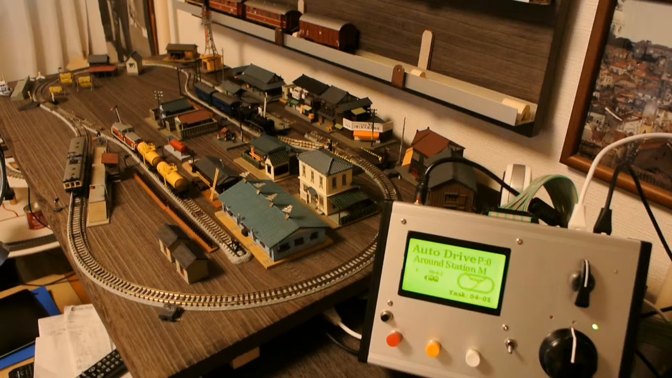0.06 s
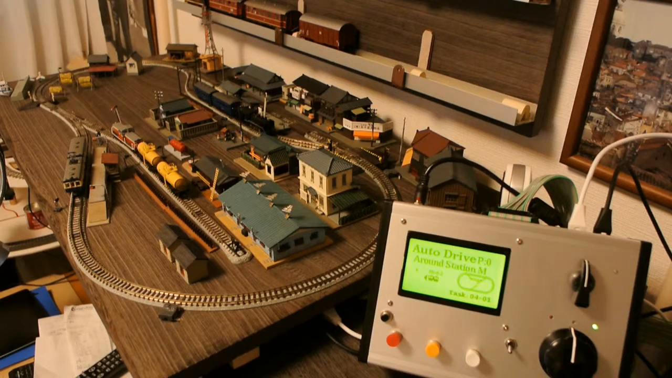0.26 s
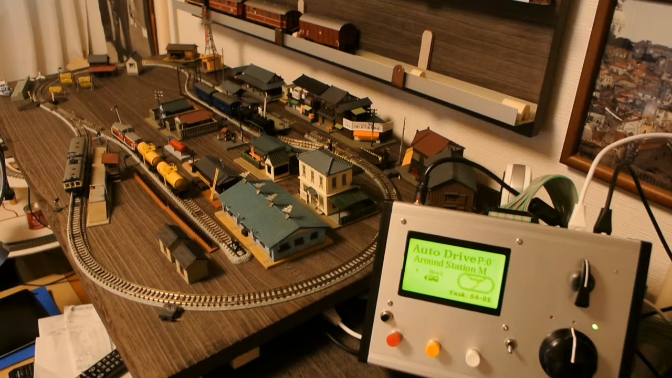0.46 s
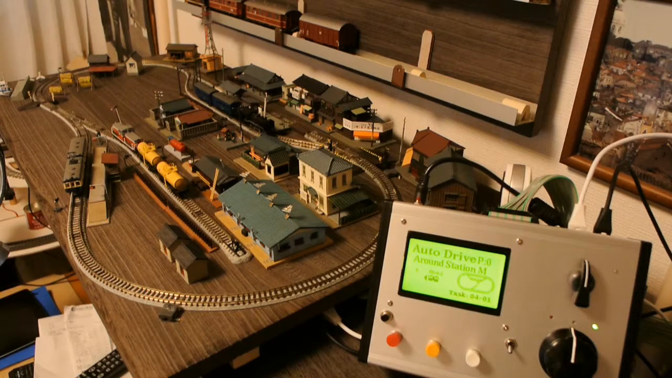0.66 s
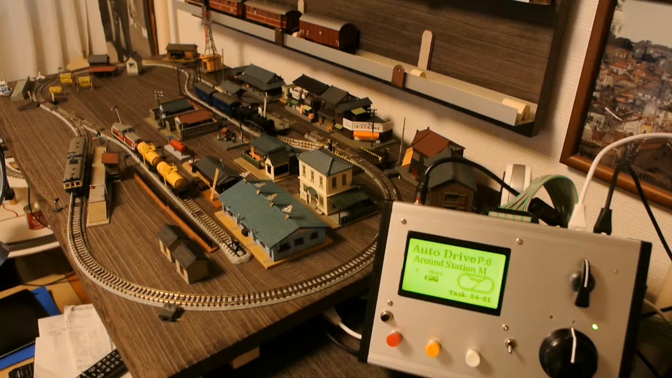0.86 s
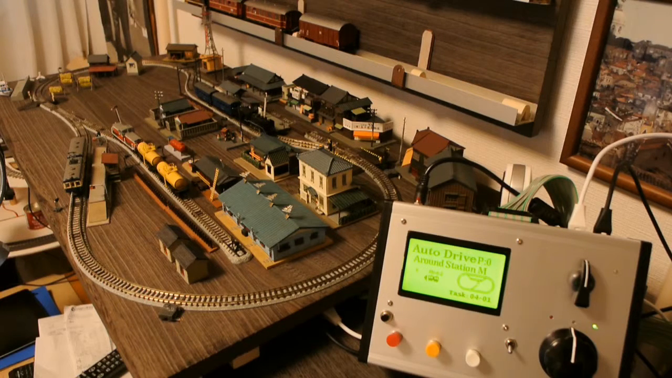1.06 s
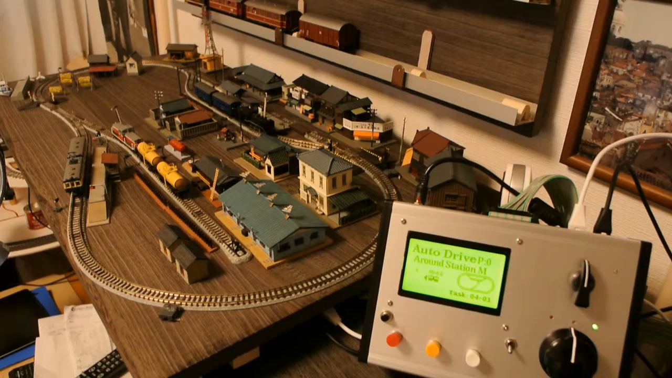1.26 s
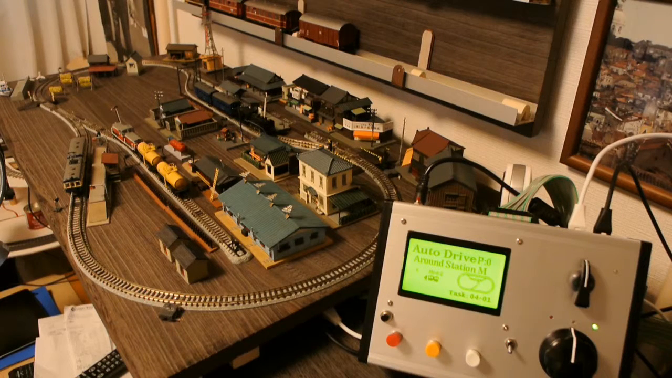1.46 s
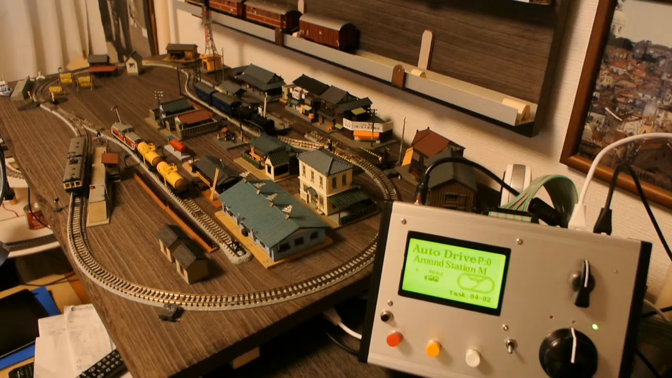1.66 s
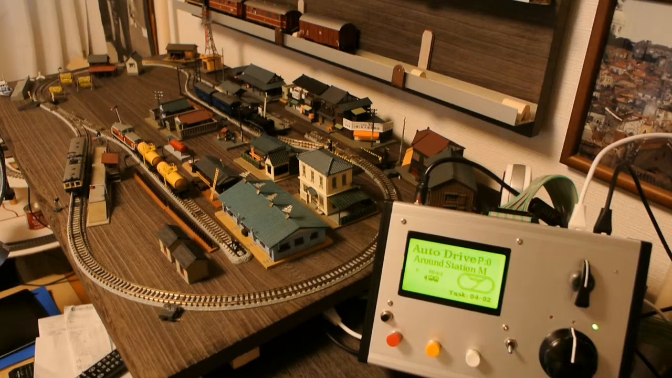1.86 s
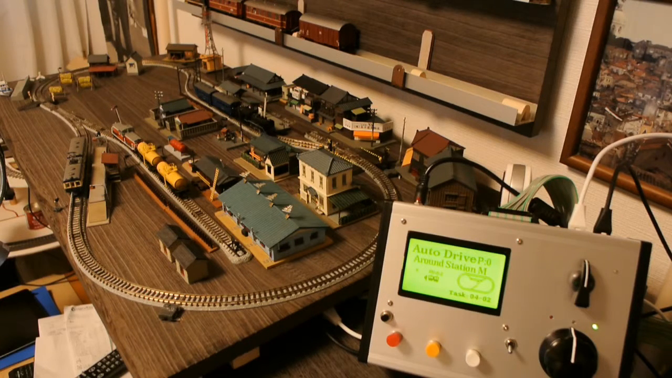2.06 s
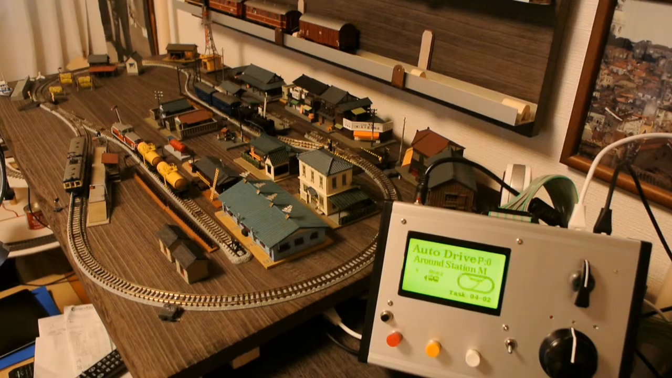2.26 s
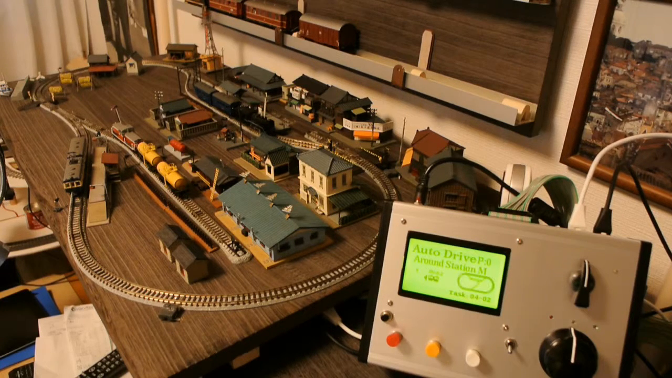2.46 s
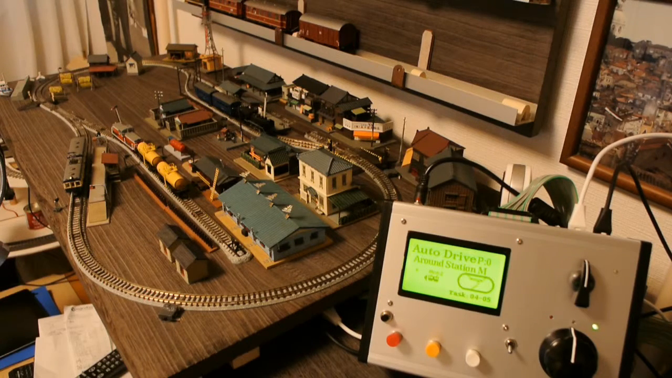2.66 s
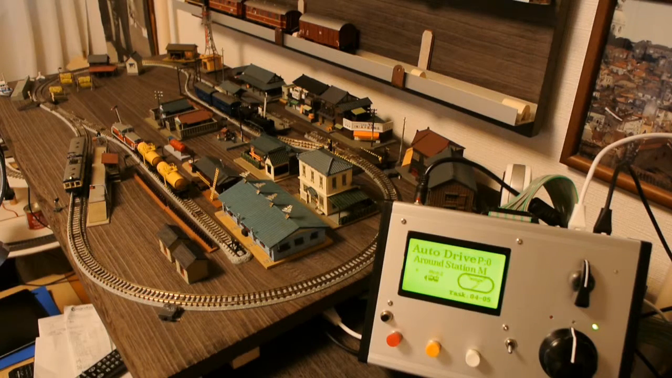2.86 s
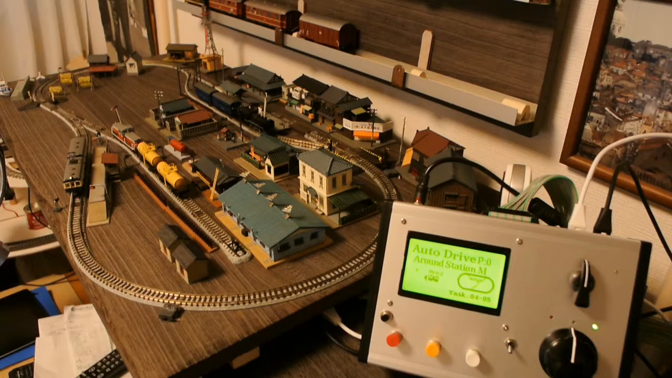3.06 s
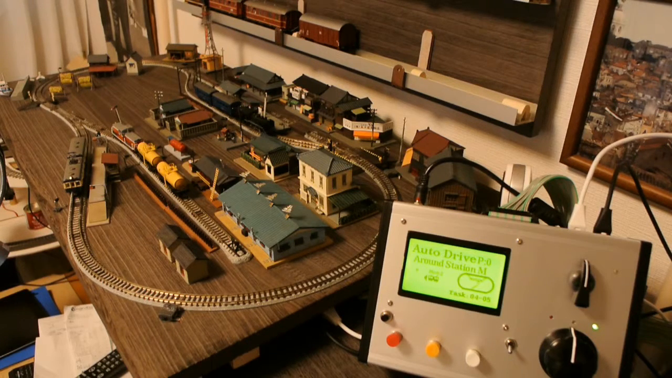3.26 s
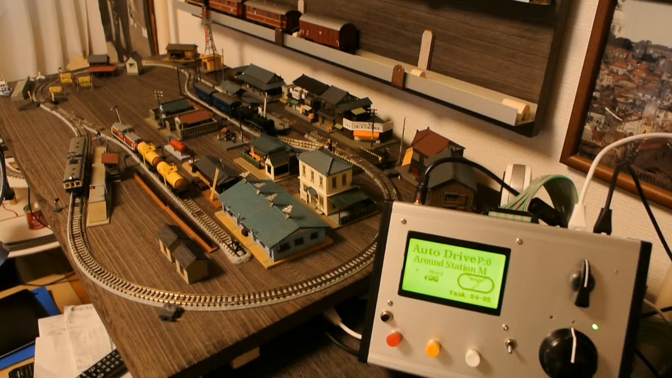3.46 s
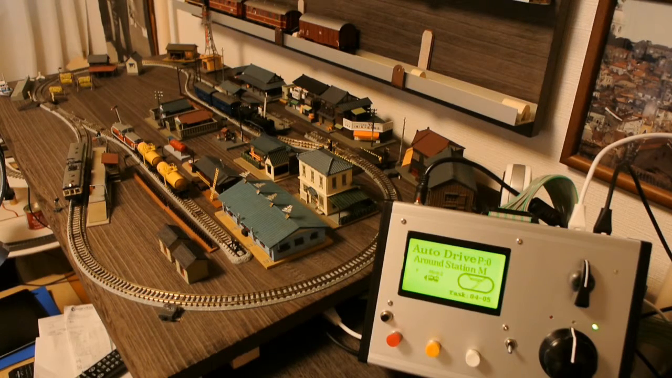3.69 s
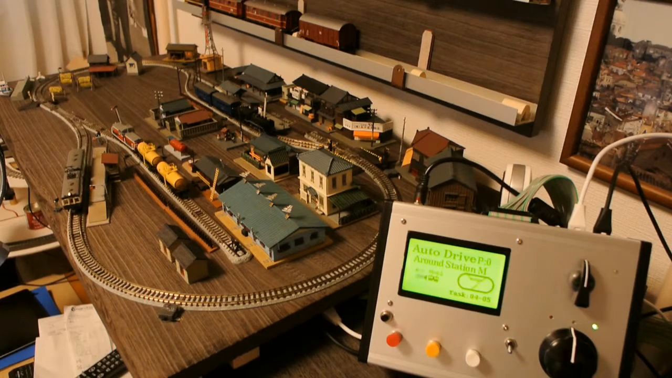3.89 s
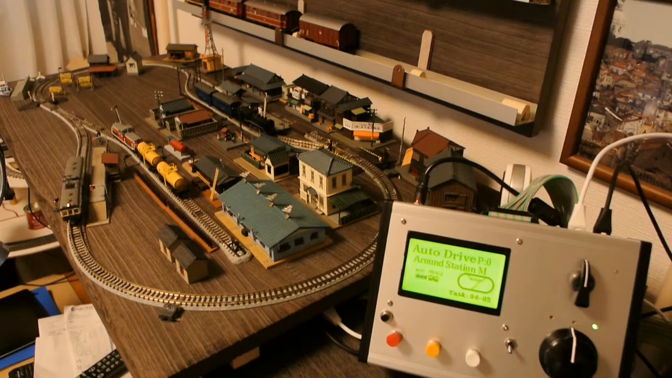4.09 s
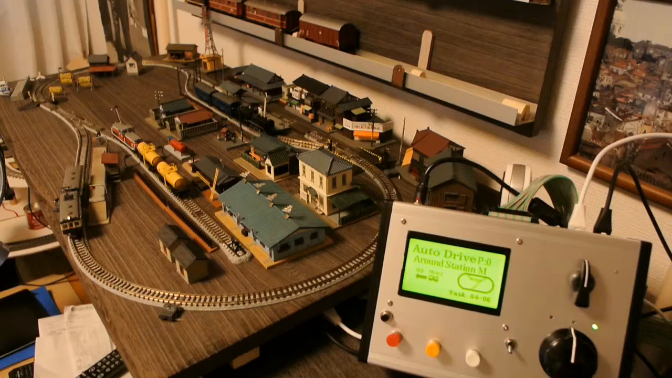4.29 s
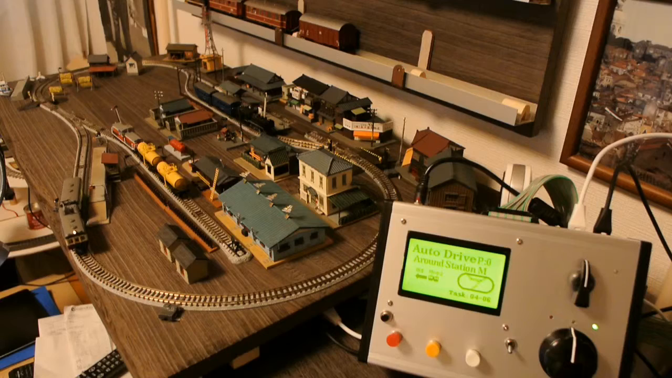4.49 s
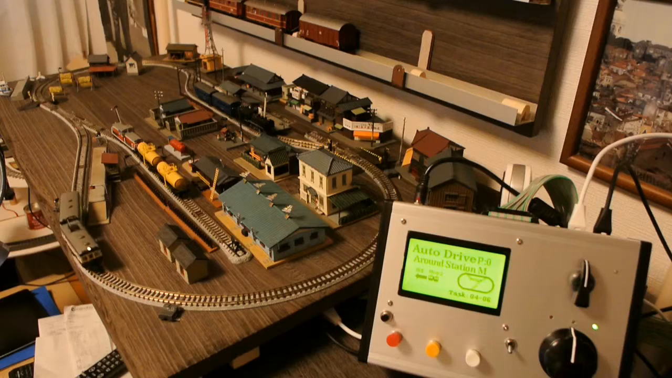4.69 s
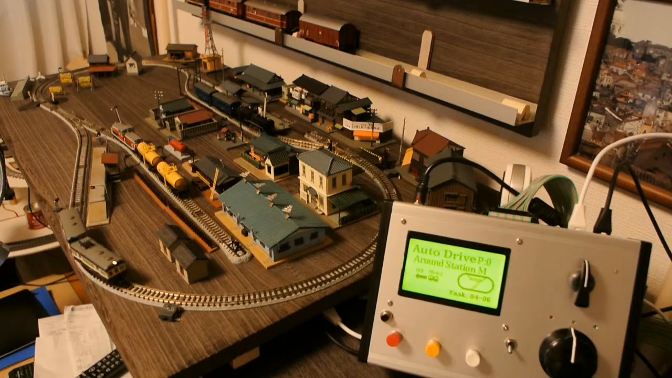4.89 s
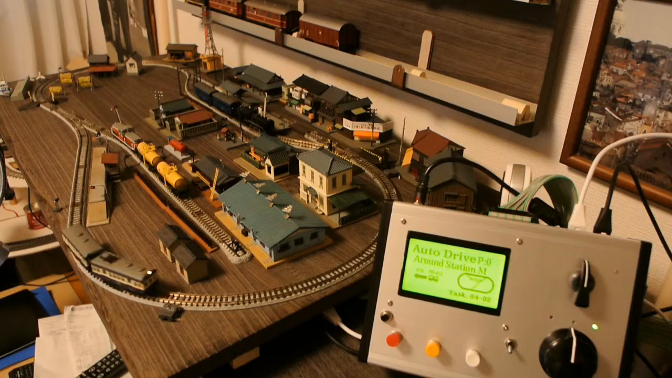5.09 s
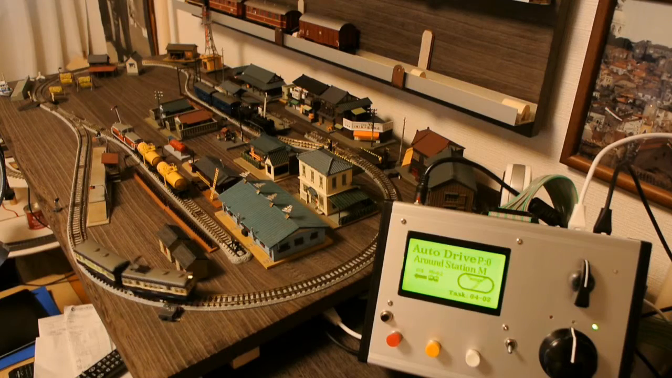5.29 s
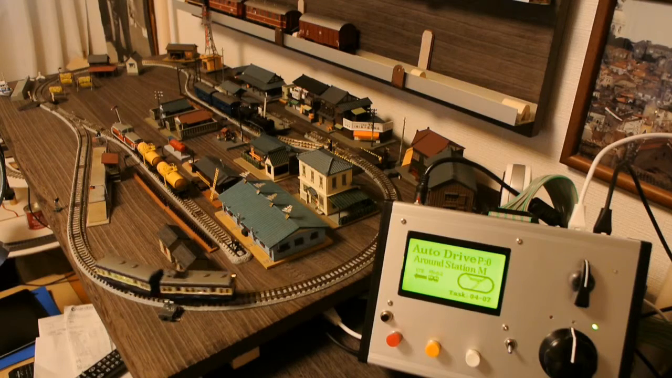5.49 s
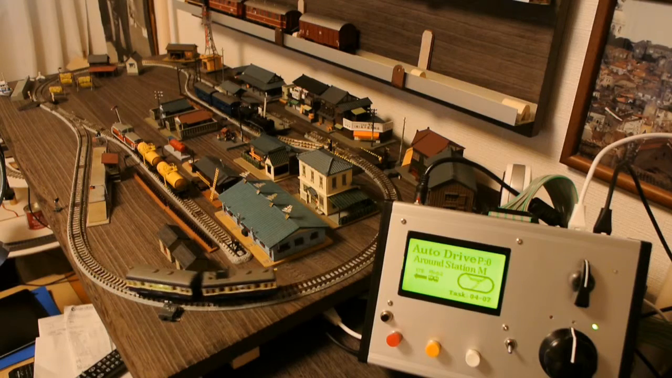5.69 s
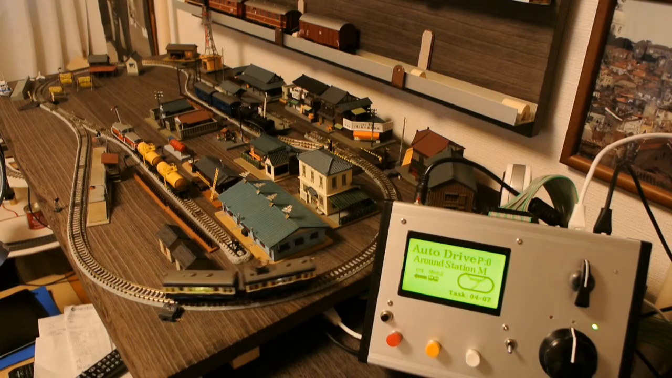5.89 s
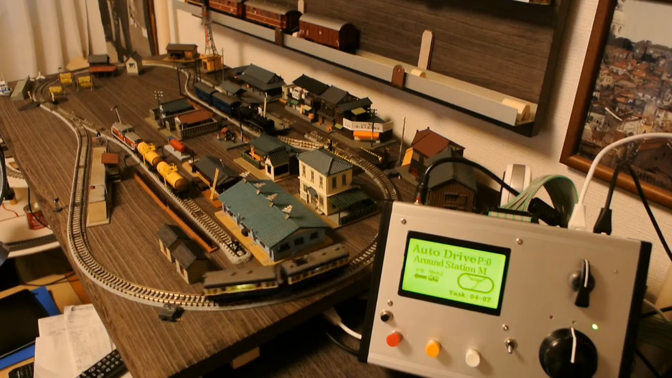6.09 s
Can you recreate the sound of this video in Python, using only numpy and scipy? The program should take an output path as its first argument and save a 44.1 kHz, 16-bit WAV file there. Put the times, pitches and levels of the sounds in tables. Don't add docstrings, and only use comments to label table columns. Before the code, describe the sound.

Three sharp switch snaps half a second apart in a quiet room, then a small model train starts and rattles along with hissing, clacking wheels.

```python
import sys
import numpy as np
from scipy import signal
from scipy.fft import rfft, irfft, next_fast_len
from scipy.io import wavfile
from scipy.ndimage import uniform_filter1d

SR = 44100
rng = np.random.default_rng(int(sys.argv[2]) if len(sys.argv) > 2 else 0)


def dump(signal):
    limited = np.clip(np.atleast_2d(signal).T, -1, 1)
    pcm = np.round(limited * 32767).astype(np.int16)
    wavfile.write(sys.argv[1], SR, pcm)


def volts(x):
    e = np.asarray(x, float) / 20
    return 10 ** e


N = 270774
TIME = np.arange(N) / SR

# t/s, level/dB
ROLLING_EFFORT = [(3.525, -59), (3.58, -58), (3.7, -51.5), (3.92, -45.5), (4.12, -41.5), (4.24, -39.5),
                  (4.75, -31), (5.11, -33), (5.5, -32.5), (6.14, -34)]
# f/Hz, level/dB
RAIL_TONE = [(1290, -28), (2200, -9.5), (2930, -10), (3130, -4), (3770, 0), (6470, 2.5), (10600, -5.5),
             (12500, -6), (15500, -11.5)]
# f/Hz, level/dB
BOARD_TONE = [(59, -52), (100, -13), (139, -49), (187, -12.5), (350, -15), (560, -14), (618, -8.5),
              (1540, 0), (1670, -0.5), (2320, -3.5), (3000, -3), (3900, -15), (6600, -120)]
# f/Hz, width/Hz, level over the broad drumming/dB
BOARD_MODES = [(356, 21, 5), (915, 47, -33), (1450, 27, -14), (1710, 41, 1), (1967, 27, -1)]
# f/Hz, width/Hz, level/dB
CAR_MODES = [(3138, 67, 1.5), (6350, 230, -24)]
# f/Hz, likeness/1
LIKENESS = [(60, 0.1), (130, 0.9), (290, 0.78), (640, 0.77), (1410, 0.81), (3100, 0.56), (6820, 0.18),
            (15000, -0.25)]


def rolling():
    hiss_db = np.interp(TIME, *np.transpose(ROLLING_EFFORT), left=-120)
    cruise_db = -33
    drum_db = -38.5 + 0.54 * (hiss_db - cruise_db)
    grit = rng.standard_normal((2, N)) * volts(0.59 * drift(400) + 1.6 * drift(24))
    rail = rms_one(resonant(coloured(grit, RAIL_TONE, LIKENESS), CAR_MODES))
    rail = wheel_ring(rail + volts(-9) * grit_ticks(per_s=900, spread_db=3.5))
    top = highpass(rail, 9000)
    shake = rng.standard_normal((2, N)) * volts(0.91 * drift(28))
    board = rms_one(resonant(coloured(shake, BOARD_TONE, LIKENESS), BOARD_MODES))
    moving = TIME > ROLLING_EFFORT[0][0]
    return volts(hiss_db + 2.0) * (rail + (volts(3) - 1) * top) + volts(drum_db + 1.0) * moving * board


def grit_ticks(per_s, spread_db):
    born = rng.random(N) < per_s * volts(4.0 * drift(15)) / SR
    sizes = volts(spread_db * np.minimum(rng.exponential(1, N), 4)) * rng.choice([-1, 1], N)
    return rms_one(resonant(direct(born * sizes, RAIL_TONE), CAR_MODES))


# f/Hz, level/dB
CLACK_TONE = [(1500, -23.5), (3000, -6.5), (5300, 2.5), (9000, -1.5), (15000, -3)]


def joints():
    s, peak_db, thud_db, t60, bright_db = contacts()
    bright_db = np.clip(bright_db, -20, 9)
    draws = rng.standard_normal((3, 2, N))
    clack = bursts(s, peak_db, t60, rise_s=0.00067) * draws[0]
    clack = resonant(coloured(clack, CLACK_TONE, LIKENESS), CAR_MODES)
    tick = bursts(s, peak_db + bright_db - 8, 0.79 * t60, rise_s=0.00033) * draws[1]
    tick = coloured(tick, [(6000, -11), (10000, -4), (15000, -3.5)], LIKENESS)
    thud = bursts(s, thud_db - 0.5, 1.46 * t60, rise_s=0.0017) * draws[2]
    thud = highpass(resonant(coloured(thud, BOARD_TONE, LIKENESS), BOARD_MODES), 600)
    edge = bursts(s, peak_db - 3.0, 0.34 * t60, rise_s=0.00012) * rng.standard_normal(N)
    metal = wheel_ring(clack + direct(edge, CLACK_TONE), less_db=0.5) + tick
    return highpass(metal, 700) + thud


# t/s, peak level/dB, crossing time/s,
# far edge over near edge/dB, brightness/dB
FROGS = [
    (3.534, -28.5, 0.039, -0.5, 7),
    (3.7103, -27.5, 0.021, 0.5, -9),
    (3.855, -27.5, 0.019, -7, 10),
    (4.023, -34.5, 0.016, -13, 2),
    (4.0684, -24.5, 0.0166, 2.5, 6),
    (4.12, -31, 0.033, -1, -5),
    (4.1746, -24.5, 0.0155, 3, 4),
    (4.2818, -24.5, 0.0186, -2, 9),
    (4.378, -21.5, 0.013, 4.5, -11),
]
# t/s, peak level/dB, thud relative to peak/dB, brightness/dB
GAPS = [(4.544, -18, -9, -7), (4.5878, -17.5, -9.5, -11), (4.6286, -17.5, -11, -12), (4.662, -19, -13, 5),
        (4.7058, -17, -8.5, -3), (4.7384, -18.5, -12, 5), (4.778, -15, -11, -11), (4.811, -18, -21, -8),
        (4.941, -17.5, -21, -4), (5.014, -19, -31, -20), (5.09, -17.5, -6.5, -8), (5.1667, -20, -5.5, 5),
        (5.449, -22, -22, -3.5), (5.4868, -23, -20, -6), (5.5822, -17, -13, 10), (5.6434, -23, -13, -11),
        (5.6597, -19, -10.5, 9), (5.7397, -17, -14, 0), (5.7525, -24, -7, -2), (5.8213, -16, -15, 2),
        (5.9687, -17.5, -6, -18), (5.988, -24, -12, -2), (6.047, -19, -31, 5), (6.1314, -17, -29, -11)]


def contacts():
    rows = []
    for s, db, span, far_db, bright in FROGS:
        # share of the crossing, level/dB
        for share, lift in [(0, 0), (0.15, -2), (0.65, -4.5), (1, far_db)]:
            rows.append((s + share * span, db + lift, db + lift - 11.5, 0.024, bright))
    for s, db, thud, bright in GAPS:
        # delay/s, level/dB
        for late, loss in [(0, 0), (0.0059, -12.5)]:
            rows.append((s + late, db + loss, db + loss + thud, 0.025, bright))
    return np.transpose(rows)


# f/Hz, width/Hz, level/dB
WHEEL_MODE = [(5180, 310, -10)]
# t/s, ring level/dB
FACING = [(3.58, 1), (3.85, 14), (4.4, 7), (5.1, -20), (6.14, -19)]


def wheel_ring(x, less_db=0):
    s, ring_db = np.transpose(FACING)
    return x + volts(np.interp(TIME, s, ring_db) + less_db) * (resonant(x, WHEEL_MODE) - x)


# f/Hz, width/Hz, level/dB
SHADOW = [(3850, 1300, 0)]
# t/s, share removed/1
SHADOW_DEPTH = [(3.5, 0), (4.0, 0), (4.5, 0.34), (5.0, .3), (5.6, 0.14), (6.14, 0.03)]


def shadowed(x):
    share = np.clip(np.interp(TIME, *np.transpose(SHADOW_DEPTH)), 0, .9)
    return x - share * (resonant(x, SHADOW) - x)


# t/s, level/dB
ROOM_SHARE = [(3.5, 1.5), (4.6, -0.5), (6.14, -2)]


def train():
    clacks = room(joints(), wet_db=np.interp(TIME, *np.transpose(ROOM_SHARE)))
    pan_db = 0.6
    return shadowed(clacks + rolling()) * volts([[pan_db / 2], [-pan_db / 2]])


# t/s, peak level/dB, left over right/dB, rattle t60/s
SNAPS = [
    (1.1385, -12.5, 1, 0.035),
    (1.6374, -11.5, 1.5, 0.048),
    (2.1376, -13.5, 0.5, 0.038),
]
# f/Hz, level/dB
SNAP_TONE = [(150, -48), (650, -10), (1100, -2), (2000, -10), (2800, -4.5), (3500, -5.5), (5000, -4),
             (15200, -1.5)]
# f/Hz, level/dB, t60/s
TURNOUTS = [
    [(798, -5.5, 0.12), (872, -2, 0.081), (1007, 0, 0.064), (1463, 0.5, 0.062), (2750, 1.5, .03),
     (3170, -7, 0.11), (4100, 7, 0.032), (4800, 3, 0.028), (8690, 6, .015), (11500, -3, .015)],
    [(730, -5, 0.093), (895, -3, 0.057), (1210, -17, 0.28), (1435, 1, 0.06), (1830, -4, 0.053),
     (2800, -15, 0.024), (4950, -3, 0.022), (7400, -6, .015), (10000, 5, .015)],
    [(336, -3.5, 0.06), (725, -5, .08), (784, 0, 0.079), (1090, -15, 0.055), (1474, 3.5, 0.044),
     (2450, 5, 0.019), (2840, 13, 0.015), (4420, 9.5, .015), (5230, -14, .015), (9930, 12, 0.014)],
]
HOLLOW_DRIVE = [-15, 4.5, 5]


def solenoids():
    s, peak_db, pan_db, t60 = np.transpose(SNAPS)
    crack = bursts(s, peak_db - 3.5, t60, rise_s=0.00076) * rng.standard_normal((2, N))
    crack = coloured(crack, SNAP_TONE, LIKENESS)
    ring, knock = np.zeros(N), np.zeros(N)
    for at, level_db, modes, drive_db in zip(s, peak_db, TURNOUTS, HOLLOW_DRIVE):
        ring += struck(at + .0005, level_db - 18, modes, swell_cycles=1.0)
        knock += hollow(at, level_db + drive_db - 24.5)
    ring = highpass(ring, 250, order=4)
    pan = volts(np.interp(TIME, s, pan_db) / 2)
    snaps = room(crack, wet_db=-0.5) + room(np.array([ring, ring]), wet_db=-11.0) + knock
    return snaps * [pan, 1 / pan]


HOLLOW_HZ = (467, 485)
# level/dB, t60/s
HOLLOW = [(-13.5, 0.47), (6, 0.14)]


def hollow(s, blow_db):
    low, high = [[(hz, level_db, t60)] for hz, (level_db, t60) in zip(HOLLOW_HZ, HOLLOW)]
    low = low + [(436, -2.5, 0.1)]
    return struck(s, blow_db, high, swell_cycles=0.92) - struck(s, blow_db, low, swell_cycles=0.69)


def struck(s, blow_db, modes, swell_cycles):
    out, at, t = np.zeros(N), round(s * SR), np.arange(SR // 2) / SR
    for hz, level_db, t60 in modes:
        swell = 1 - np.exp(-t * hz / swell_cycles)
        out[at:at + len(t)] += volts(blow_db + level_db - 60 * t / t60) * swell * np.sin(2 * np.pi * hz * t)
    return out


# t/s, peak level/dB, f/Hz
CREAKS = [
    (0.439, -41.5, 1220),
    (0.469, -43, 1710),
    (0.969, -39, 872),
    (1, -44.5, 1800),
    (2.469, -54, 476),
    (2.654, -35.5, 183),
    (2.714, -48, 178),
    (3.019, -42, 299),
]


def creaks():
    out = np.zeros(N)
    for s, peak_db, hz in CREAKS:
        puff = bursts([s], [peak_db - 1.0], [0.082 + 25 / hz], rise_s=4.8 / hz) * rng.standard_normal(N)
        out += resonant(puff, [(hz, 0.36 * hz, 12)]) - puff
    return room(np.array([out, out]), wet_db=-17.0)


# f/Hz, level/dB
FLOOR_TONE = [(12, -42), (20, -14), (83, -6), (140, -7), (180, -4.5), (225, -10), (274, -3.5), (534, -4.5),
              (667, -4.5), (834, -6), (1010, -5), (1160, -6), (15500, -8)]
# f/Hz, likeness/1
FLOOR_LIKENESS = [(60, 0.96), (180, 0.37), (550, 0.39), (1650, -0.0028), (4970, 0.0063), (15000, -0.0092)]


def microphone_hiss():
    return volts(-50.5 + 4) * coloured(rng.standard_normal((2, N)), FLOOR_TONE, FLOOR_LIKENESS)


def room(x, wet_db):
    t, t60 = np.arange(SR // 2) / SR, 0.23
    tail = rng.standard_normal((2, len(t))) * volts(-60 * t / t60) * (1 - np.exp(-t / 0.003))
    tail = tail / np.sqrt(np.sum(tail[0] ** 2))
    tail = coloured(tail, [(200, -1.5), (2000, -7), (16000, -8.5)], LIKENESS)
    return x + signal.fftconvolve(volts(wet_db) * x.mean(axis=0, keepdims=True), tail)[:, :N]


def direct(clicks, tone):
    hz, lag_s = np.fft.rfftfreq(N, 1 / SR), 3e-5
    shaped = rfft(clicks) * rms_one(volts(at_hz(tone, hz)))
    return irfft([shaped, shaped * np.exp(-2j * np.pi * hz * lag_s)], N)


def coloured(pair, tone, likeness):
    size = next_fast_len(pair.shape[1] + 4096)
    hz = np.fft.rfftfreq(size, 1 / SR)
    alike = np.clip(at_hz(likeness, hz), -.95, .99)
    mid, side = rfft(pair, size) * rms_one(volts(at_hz(tone, hz)))
    mid, side = np.sqrt((1 + alike) / 2) * mid, np.sqrt((1 - alike) / 2) * side
    return irfft([mid + side, mid - side], size)[:, :pair.shape[1]]


def resonant(x, modes):
    out = x.copy()
    for hz, width_hz, level_db in modes:
        r = np.exp(-np.pi * width_hz / SR)
        zeros = np.array([1, 0, -1]) * (1 - r * r) / 2
        poles = [1, -2 * r * np.cos(2 * np.pi * hz / SR), r * r]
        out += volts(level_db) * signal.lfilter(zeros, poles, x)
    return out


def bursts(times, levels_db, t60s, rise_s):
    out, t = np.zeros(N + SR), np.arange(SR // 4) / SR
    for s, level_db, t60 in zip(times, levels_db, t60s):
        at = round(s * SR)
        out[at:at + len(t)] += volts(level_db - 60 * t / max(t60, .004)) * (1 - np.exp(-t / rise_s))
    return out[:N]


def drift(rate):
    r = np.exp(-2 * np.pi * rate / SR)
    return rms_one(signal.lfilter([1], [1, -2 * r, r * r], rng.standard_normal(N + SR))[SR:])


def highpass(x, hz, order=2):
    return signal.sosfilt(signal.butter(order, hz, "high", fs=SR, output="sos"), x)


def at_hz(points, hz):
    f, values = np.transpose(points)
    return np.interp(np.log(np.clip(hz, 1, 15200)), np.log(f), values)


def rms_one(x):
    return x / np.sqrt(np.mean(x ** 2) + 1e-20)


def scene():
    return train() + solenoids() + creaks() + microphone_hiss()


# t/s, length/s
BASS_GAPS = [(4.173, 0.02), (4.534, 0.094), (4.65, 0.027), (4.798, 0.023), (5.554, 0.062), (5.638, 0.04),
             (5.713, 0.027), (5.807, 0.015)]


def starved(x):
    gap = uniform_filter1d(sum(1. * ((TIME > s) & (TIME < s + length)) for s, length in BASS_GAPS), size=300)
    bass = signal.sosfiltfilt(signal.butter(2, 430, fs=SR, output="sos"), x)
    return x - np.clip(0.65 * gap, 0, 1) * bass


def roll_off(x):
    return signal.sosfilt(signal.butter(12, 16890, fs=SR, output="sos"), x)


def record(dry):
    dropout = uniform_filter1d(1. * ((TIME > 1.626) & (TIME < 1.634)), size=60)
    cut = signal.sosfilt(signal.ellip(10, .5, 45, 15900, fs=SR, output="sos"), dry)
    mix = starved(cut) * (1 - 0.98 * dropout)
    return roll_off(mix)


dry = scene()
out = record(dry)
dump(out)
```